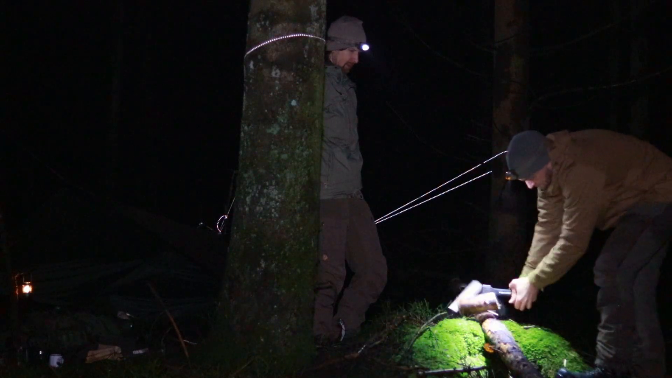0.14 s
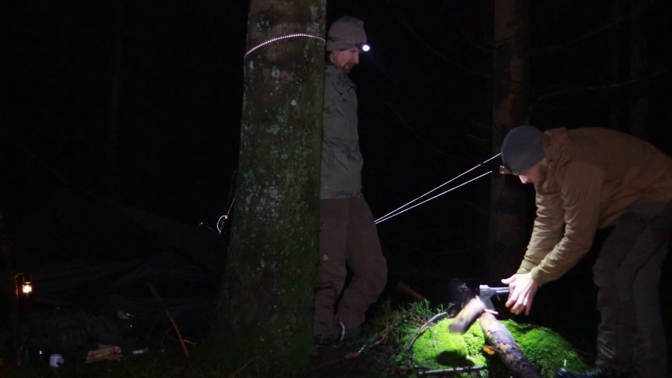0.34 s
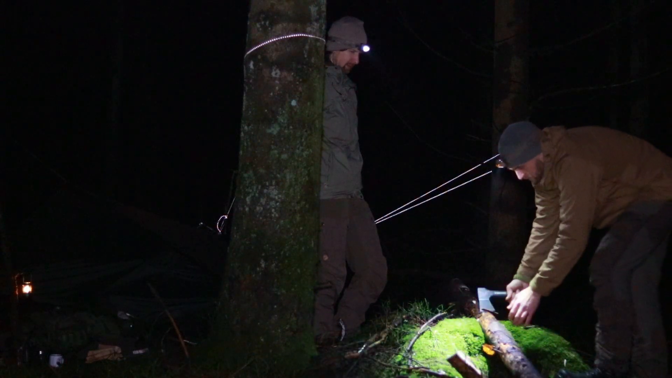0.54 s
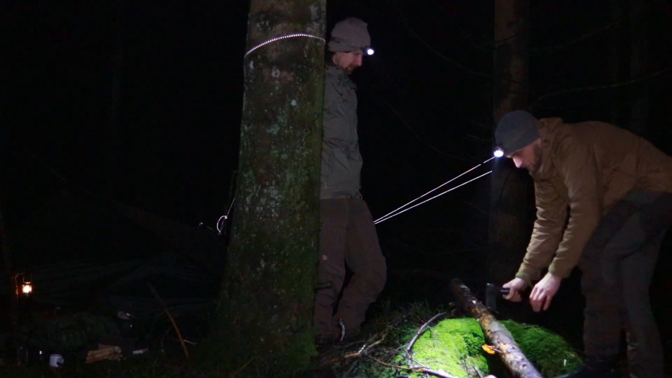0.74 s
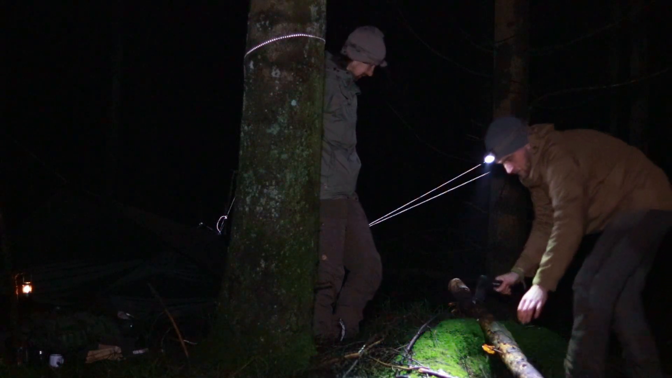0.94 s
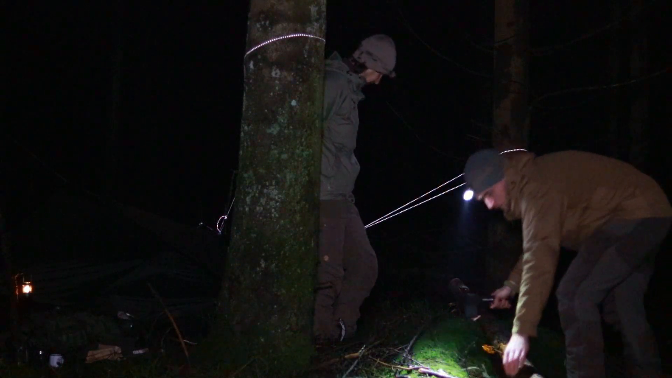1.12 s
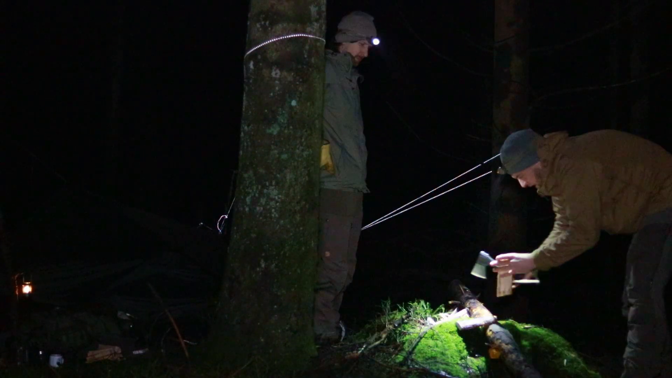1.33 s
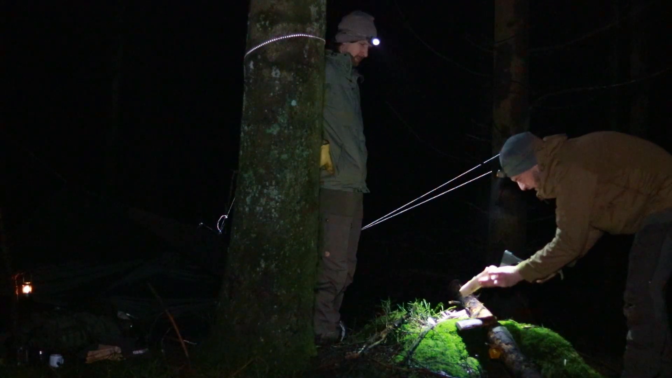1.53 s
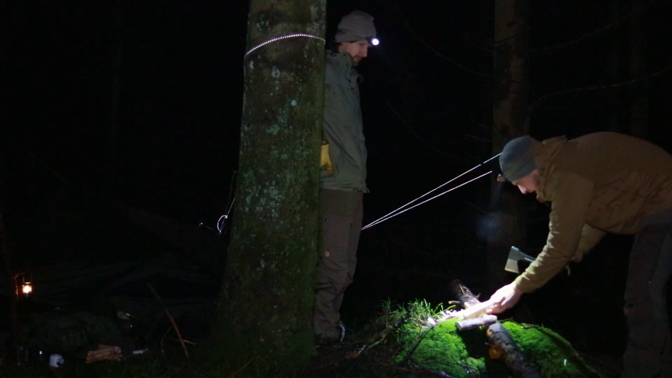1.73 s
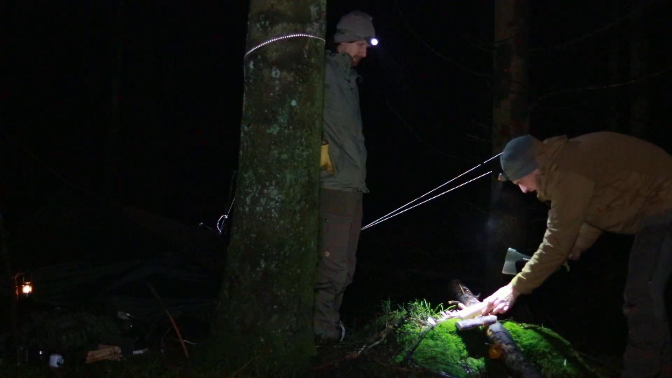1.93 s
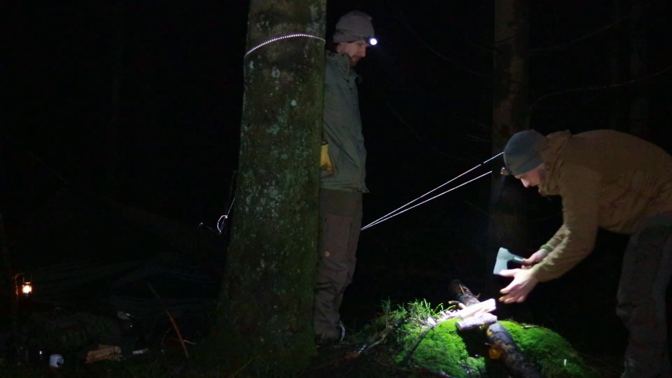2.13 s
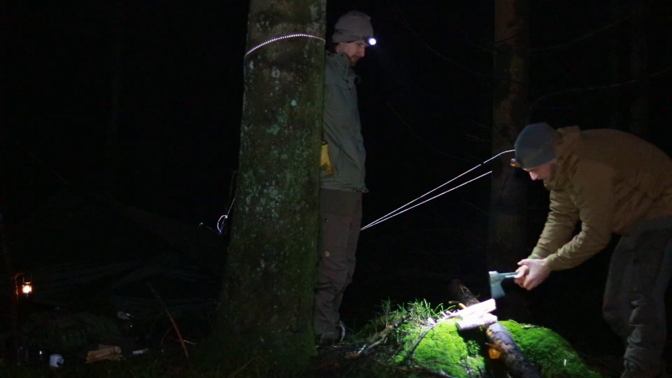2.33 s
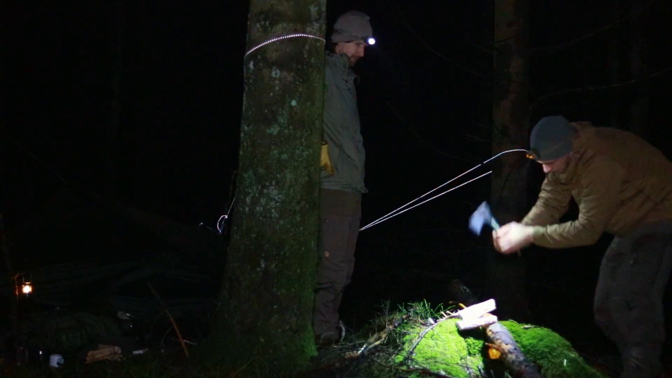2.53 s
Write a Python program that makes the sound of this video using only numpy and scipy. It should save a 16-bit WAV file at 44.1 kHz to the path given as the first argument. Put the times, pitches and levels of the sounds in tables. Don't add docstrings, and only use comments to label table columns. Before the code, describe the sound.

Early on, one loud woody chop with tearing fibres and a brief steel ring scatters into a long forest tail; sharp splinter clicks and a light wood tap follow, with soft wind and steady microphone hiss.

```python
import sys
import numpy as np
from scipy import signal
from scipy.fft import rfft, irfft
from scipy.io import wavfile

SR = 44100
rng = np.random.default_rng(int(sys.argv[2]) if len(sys.argv) > 2 else 0)


def ratio(d):
    e = np.asarray(d, float) / 20
    return 10 ** e


def dump_mix(stems):
    frames = np.atleast_2d(stems).T
    limited = np.clip(frames, -1, 1)
    pcm = np.round(limited * 32767).astype(np.int16)
    wavfile.write(sys.argv[1], SR, pcm)


N = 114660
BLOW_S = 0.232


def rms_one(x):
    return x / np.sqrt(np.mean(x ** 2) + 1e-20)


def drift(rate_hz):
    r = np.exp(-80 * np.pi * rate_hz / SR)
    slow = signal.lfilter([1], [1, -2 * r, r * r], rng.standard_normal(N // 40 + 2002))[2000:]
    return np.interp(np.arange(N) / 40, np.arange(len(slow)), rms_one(slow))


def ring(x, hz, t60):
    r = ratio(-60 / (t60 * SR))
    w = 2 * np.pi * hz / SR
    return signal.lfilter([0, np.sin(w)], [1, -2 * r * np.cos(w), r * r], x + 1e-18)


def random_clicks(per_s, spread_db, largest):
    happens = rng.random(N) < per_s / SR
    strength = ratio(spread_db * np.minimum(rng.exponential(1, N), largest))
    return happens * strength * rng.choice([-1, 1], N)


def coloured(spectrum, patchy_db):
    hz = np.fft.rfftfreq(N, 1 / SR) + 1
    table_hz, table_db = np.transpose(spectrum)
    level_db = np.interp(np.log(hz), np.log(table_hz), table_db)
    inside = (hz > table_hz[0]) & (hz < table_hz[-1])
    shaped = rfft(rng.standard_normal(N)) * ratio(level_db) * inside
    out = 0
    for centre in 32 * 2.0 ** np.arange(10):
        share = np.clip(1 - np.abs(np.log2(hz / centre)), 0, 1)
        out = out + irfft(shaped * share, N) * ratio(patchy_db * drift(8.3))
    return rms_one(out)


# frequency in Hz, level in dB per Hz.
HISS_COLOUR = [(500, 7.5), (4000, 3.5), (8000, 1.5), (13000, 0), (16500, -1)]


def hiss():
    edge = signal.ellip(10, 0.5, 60, 15850, fs=SR, output="sos")
    return ratio(-58.5) * signal.sosfilt(edge, coloured(HISS_COLOUR, patchy_db=0.15))


# frequency in Hz, level in dB per Hz.
WIND_COLOUR = [(18, -70), (35, -41), (65, -17), (120, -14.5), (200, -7.5), (310, 0.5), (650, 0.5),
               (1500, -9), (4000, -29)]
# time in seconds, level in dB.
WIND_STRENGTH = [(0.0, -52.5), (0.21, -51.5), (0.39, -48), (0.74, -50), (2.48, -49), (2.6, -49.5)]


def wind():
    s, db = np.transpose(WIND_STRENGTH)
    strength = ratio(np.interp(np.arange(N) / SR, s, db))
    return strength * coloured(WIND_COLOUR, patchy_db=1.13)


# frequency in Hz, width in Hz, level in dB, seconds to fade by 60 dB.
TRUNK_RETURN = [(706, 104, -12.5, 1.36), (1170, 640, -20, 1.3), (1875, 35, -9.5, 2.12),
                (2300, 400, -5, 1.89), (2900, 500, -7.5, 1.74), (3600, 340, -17.5, 1.8),
                (4350, 260, -4, 1.38), (5000, 1060, -10, 1.63), (6370, 1900, -13.5, 1.37),
                (7660, 920, -9.5, 1.13), (9100, 1800, -10, 0.67), (12300, 900, -19, 0.64),
                (14000, 3000, -25, 0.37)]


def forest():
    gather_s = 0.058
    t = np.maximum(np.arange(N) / SR - BLOW_S, 0)
    clump = ratio(0.4 * drift(17))
    out = 0
    for hz, width, db, t60 in TRUNK_RETURN:
        echoes = random_clicks(per_s=9000, spread_db=2.0, largest=np.inf)
        band = rms_one(ring(ring(echoes, hz, 1.4 / width), hz, 1.4 / width))
        out = out + band * ratio(db - 60 * t / t60)
    return ratio(-29.5) * out * clump * (1 - np.exp(-t / gather_s))


# start in seconds, length in seconds, level in dB.
RUB_STROKES = [
    (1.135, .075, -60),
    (1.21, .16, -66),
    (1.370, .012, -60),
    (1.390, .022, -55),
    (1.422, .026, -53),
    (1.445, .015, -58),
    (1.65, .06, -65),
]


def rustle():
    t = np.arange(N) / SR
    stroke = 0
    for s, length, db in RUB_STROKES:
        stroke = stroke + ratio(db) * np.sin(np.pi * np.clip((t - s) / length, 0, 1))
    grains = random_clicks(per_s=3000, spread_db=2.6, largest=4)
    band = signal.butter(2, [3500, 8500], "band", fs=SR, output="sos")
    return rms_one(signal.sosfilt(band, grains)) * stroke * ratio(5.9 * drift(84))


def breaking_fibres(rows, edge_db, fray_db, fray_s):
    size, edge_s = 4000, 0.003
    out = np.zeros(N + SR)
    t = np.arange(size) / SR
    for s, db, hz, t60 in rows:
        noise = rng.standard_normal(size)
        tone = np.sin(2 * np.pi * hz * t) * ratio(-60 * t / t60) * (1 - np.exp(-t / 0.000067))
        broad = rms_one(ring(ring(noise, hz, 1.07 / hz), hz, 1.07 / hz))
        narrow = rms_one(ring(ring(noise[::-1], hz, 3.3 / hz), hz, 3.3 / hz))
        rough = broad * ratio(edge_db - 60 * t / edge_s) + narrow * ratio(fray_db - 60 * t / fray_s)
        brightened = np.diff(rough, prepend=0) * SR / (2 * np.pi * hz)
        start = int(s * SR)
        out[start:start + size] += ratio(db) * (tone + brightened)
    return out[:N]


# start in seconds, peak in dB, pitch in Hz, seconds to fade by 60 dB.
SPLINTER_SNAPS = [(.3648, -22, 4300, 0.015), (.3792, -22.5, 2580, 0.021), (.5575, -26.5, 1140, 0.014),
                  (.5760, -6.5, 11970, 0.0043), (.5762, -18, 7200, .004), (.5761, -18, 9000, .004),
                  (.5762, -23, 4460, 0.0099), (.5785, -36, 4800, 0.011), (.5905, -27, 4730, 0.01),
                  (.8990, -37.5, 8200, 0.006), (.8991, -37, 12100, 0.0054), (1.0070, -42, 11000, 0.0036),
                  (1.0737, -30, 6070, 0.0022), (1.0738, -34, 13300, 0.0023), (1.0740, -21.5, 940, 0.0033),
                  (1.0780, -46, 12500, 0.0071), (1.0912, -25, 1840, 0.0019), (1.0948, -38.5, 3000, 0.0055),
                  (1.1510, -27, 5900, 0.0025), (1.1560, -13, 8050, 0.0024), (1.1561, -14.5, 4900, 0.0016),
                  (1.1562, -11, 1700, 0.0014), (1.1720, -42, 5600, .006), (1.3905, -30, 3200, 0.0039),
                  (1.4260, -44, 5200, 0.0045), (1.4370, -38, 4300, .006), (1.4495, -36, 1580, 0.0077),
                  (1.8020, -41.5, 2530, 0.0073), (1.8605, -44.5, 4170, 0.019), (1.8610, -43, 8460, 0.009)]


def splinters():
    return breaking_fibres(SPLINTER_SNAPS, edge_db=-6.5, fray_db=-33, fray_s=0.09)


# frequency in Hz, level in dB, seconds to fade by 60 dB.
WOOD_MODES = [(81, -25.5, 0.115), (143, -18.5, .04), (243, -14.5, .17), (338.5, -12.5, 0.18),
              (280, -13, 0.0067), (407, -11, 0.028), (472, -17, 0.056), (590, -4, 0.01), (715, -10, 0.035),
              (986, -10.5, 0.034), (1308, -9, 0.013)]


def struck_wood(contacts, low_hz, order):
    size = 400
    pushes = np.zeros(N + SR)
    for s, db, hz, sign in contacts:
        start = int(s * SR)
        t = (np.arange(size) - s * SR % 1) / SR
        u = np.maximum(t, 0) * 2 * np.pi * hz
        push = u * np.exp(-u) * 2 * np.pi * hz / SR
        pushes[start:start + size] += np.sign(sign) * ratio(db) * push
    modes = sum(ratio(db) * ring(pushes[:N], hz, t60) for hz, db, t60 in WOOD_MODES)
    return signal.sosfilt(signal.butter(order, low_hz, "high", fs=SR, output="sos"), modes)


# start in seconds, peak in dB, hardness as low-pass in Hz, push 1 or pull -1.
LAID_PIECES = [
    (1.1500, -29, 248, 1),
    (1.1538, -16.5, 334, 1),
    (1.390, -36, 500, 1),
    (1.4300, -44, 695, 1),
]


def laid_pieces():
    return struck_wood(LAID_PIECES, low_hz=164, order=5)


# frequency in Hz, level in dB, seconds to fade by 60 dB.
STEEL_MODES = [(1884, -29.5, 0.5), (2185, -52, 0.3), (4300, -33.5, 0.29), (7600, -42, 0.28)]


def steel():
    bite = np.zeros(N)
    bite[int(BLOW_S * SR)] = 1
    return sum(ratio(db) * ring(bite, hz, t60) for hz, db, t60 in STEEL_MODES)


# start in seconds, peak in dB, pitch in Hz, seconds to fade by 60 dB.
SPLIT_CRACKS = [(.2255, -15, 2330, 0.0045), (.2283, -21, 2440, 0.0036), (.2306, -8, 8440, .005),
                (.2308, -6.5, 3600, 0.0023), (.2315, -3, 2195, 0.0091), (.2325, -12, 4900, 0.016),
                (.2335, -25, 7600, 0.007), (.2345, -19.5, 1480, 0.0048), (.2352, -14.5, 7600, 0.012),
                (.2360, -9.5, 2710, 0.013), (.2395, -33, 4170, 0.015), (.2412, -35, 7050, .005),
                (.2458, -15.5, 7640, 0.0084), (.2460, -10, 2180, 0.0039), (.2680, -30, 7600, 0.0087)]


def cracks():
    return breaking_fibres(SPLIT_CRACKS, edge_db=2, fray_db=-14.5, fray_s=0.042)


# start in seconds, peak in dB, hardness as low-pass in Hz, push 1 or pull -1.
BLOW_CONTACTS = [
    (.2228, -20, 696, 1),
    (.2238, -7, 1210, -1),
    (.2245, -9, 1460, 1),
    (0.2251, -5.5, 1760, -1),
    (.2270, -9, 970, -1),
    (.2280, -2, 1500, 1),
    (.2300, -2.5, 1950, 1),
    (0.2311, -2, 1980, -1),
    (.2332, -6, 2550, 1),
    (.2385, -28, 900, 1),
]


def blow():
    return struck_wood(BLOW_CONTACTS, low_hz=75.6, order=2)


def scene():
    wood = blow() + laid_pieces()
    thin = cracks() + splinters() + steel() + forest() + rustle()
    thin = signal.sosfilt(signal.butter(3, 250, "high", fs=SR, output="sos"), thin)
    return (wood + thin + wind() + hiss())[None]


def roll_off(x):
    return signal.sosfilt(signal.butter(12, 16400, fs=SR, output="sos"), x)


def record(dry):
    top = 4.8
    x = np.clip(top * np.tanh(dry / top), -1, 1)
    x = signal.sosfilt(signal.cheby2(8, 36, 16800, fs=SR, output="sos"), x)
    return roll_off(x)


dry = scene()
out = record(dry)
dump_mix(out)
```